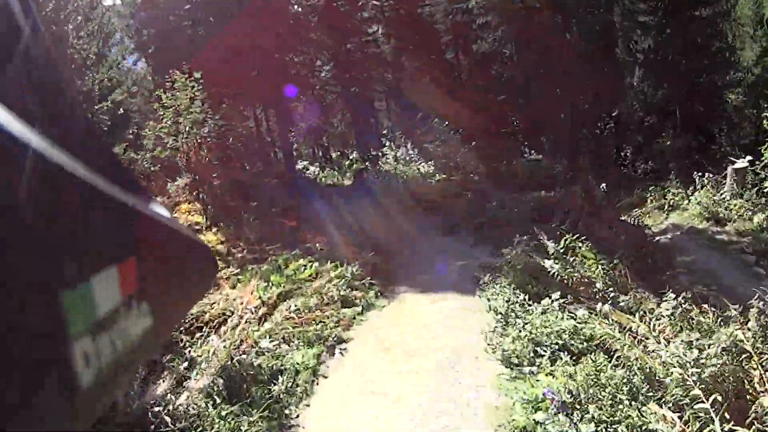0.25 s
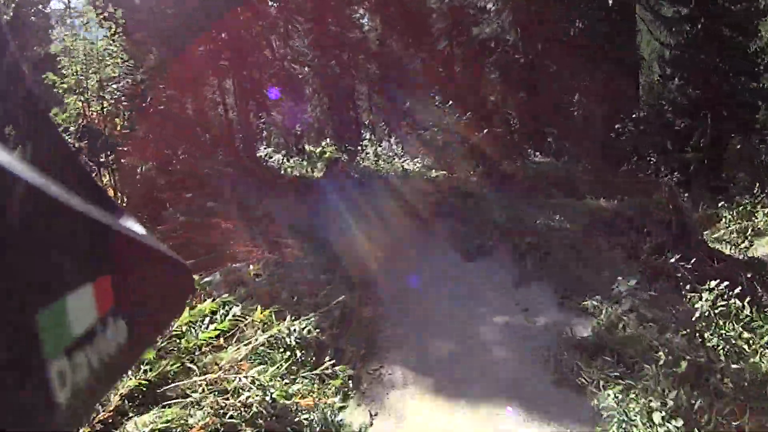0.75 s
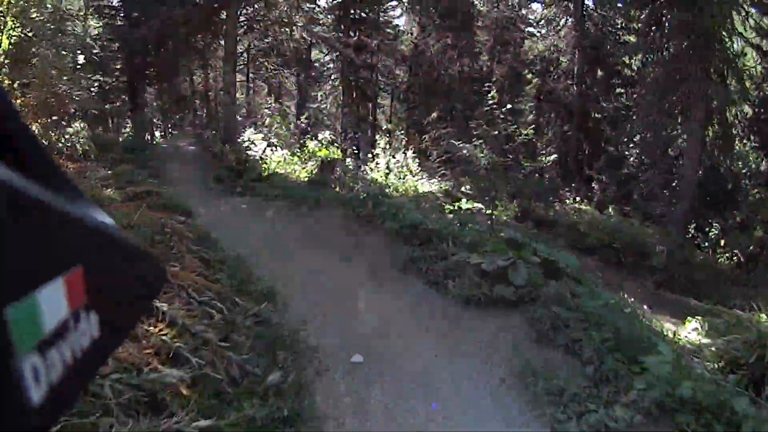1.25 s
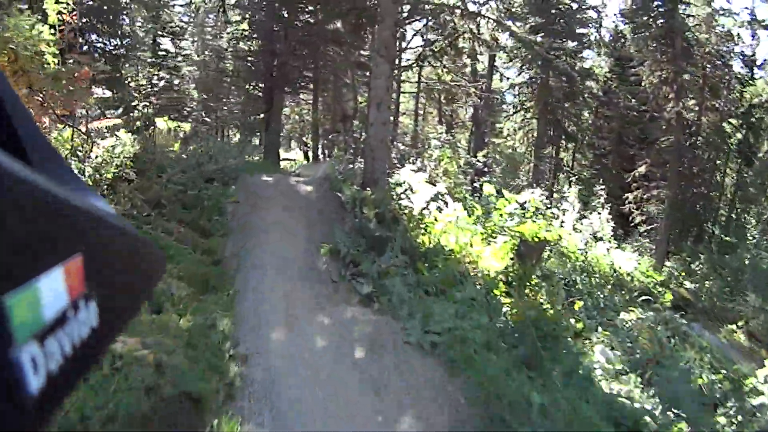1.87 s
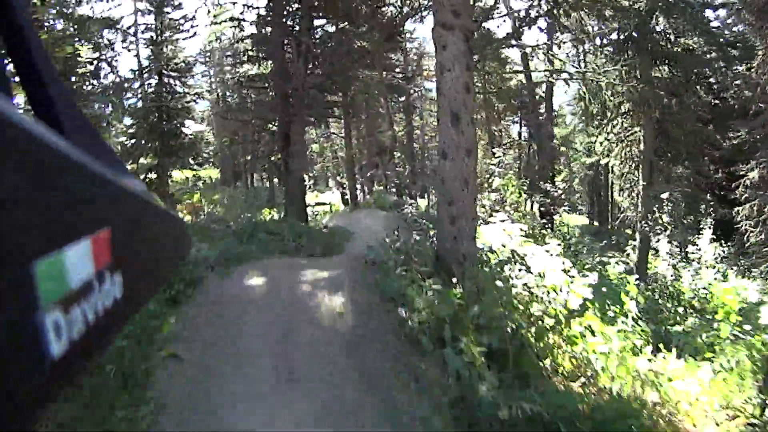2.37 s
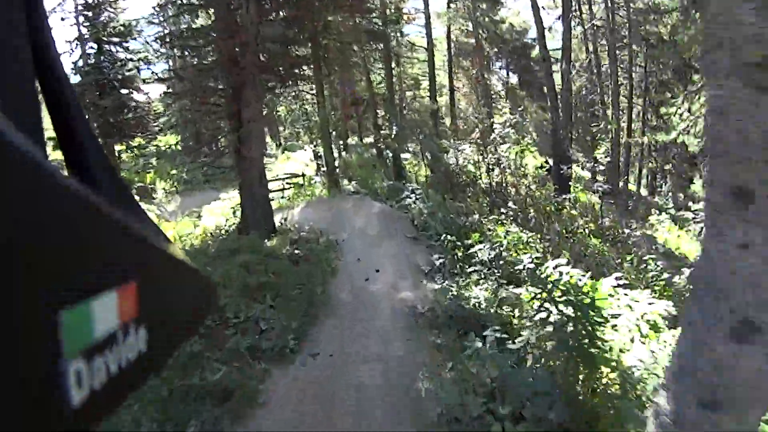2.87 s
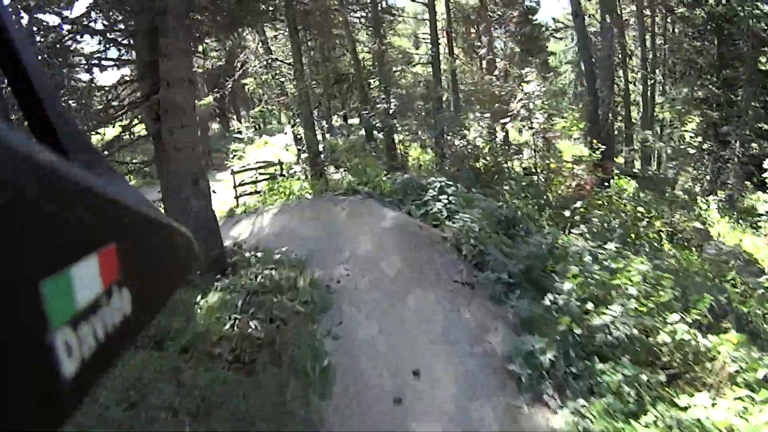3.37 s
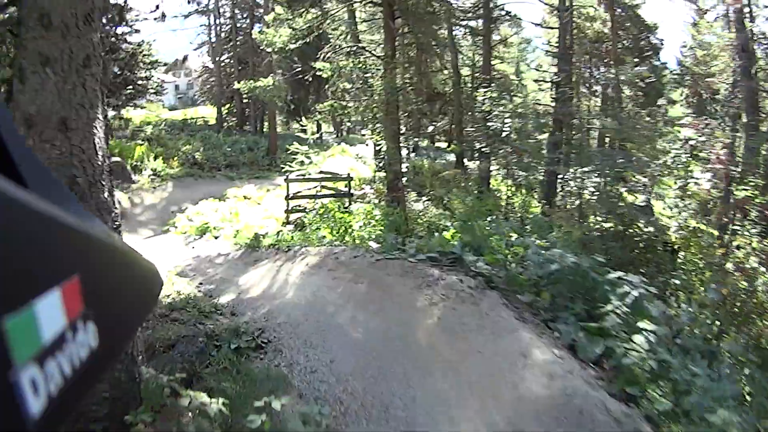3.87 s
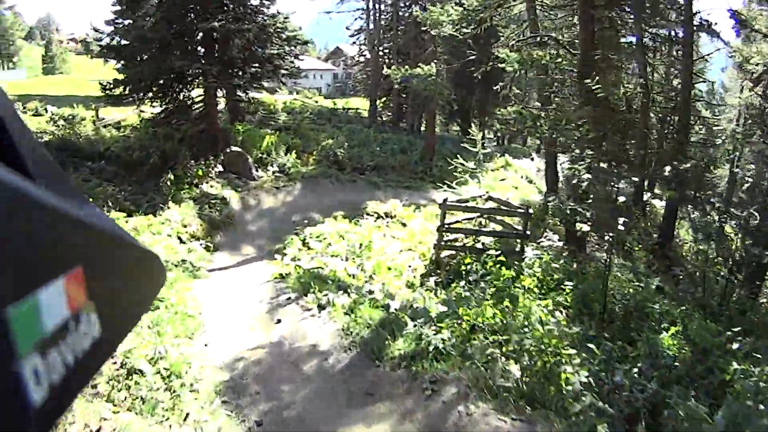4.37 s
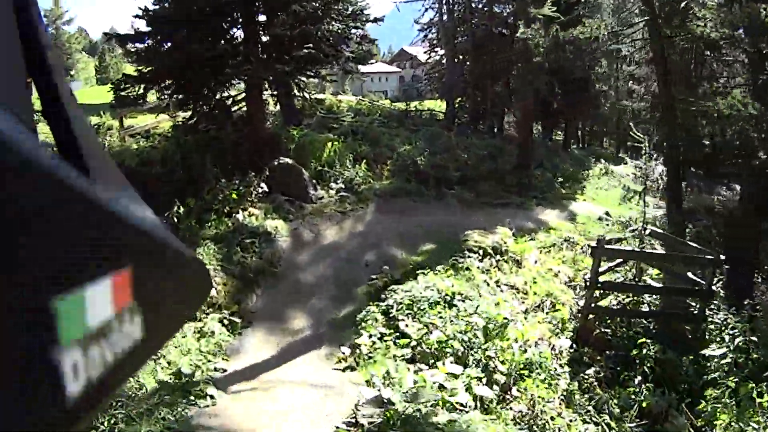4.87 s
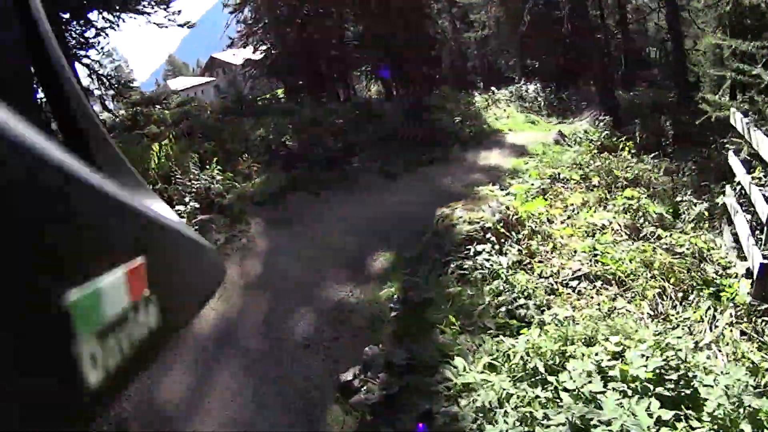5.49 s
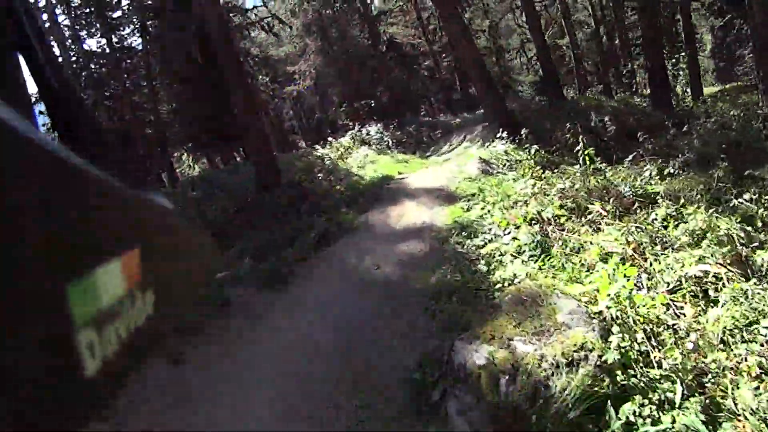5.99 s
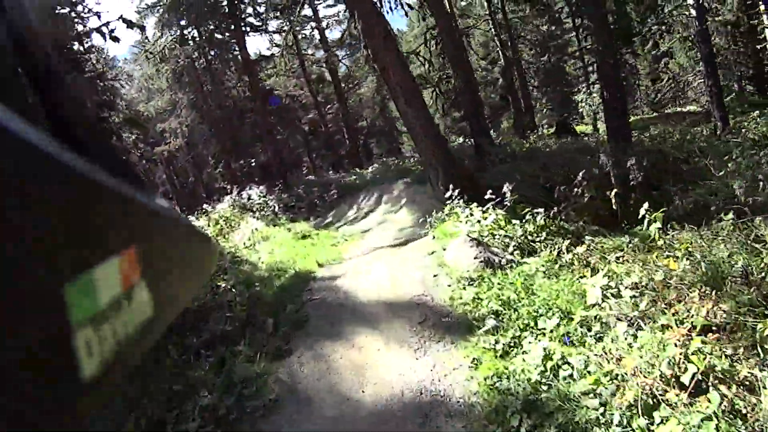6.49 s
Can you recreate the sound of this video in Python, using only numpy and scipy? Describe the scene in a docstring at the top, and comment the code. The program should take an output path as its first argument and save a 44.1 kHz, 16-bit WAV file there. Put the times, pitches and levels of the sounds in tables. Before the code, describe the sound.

A bike coasts down a forest trail, heard from a helmet microphone. Lumpy wind rumble and sharp pops cover the first second, then fall away to reveal crunching tyres, rapid freewheel ticking and dry rattles. Gusts return around two and a half seconds, ease near three and a half for more clatter, then build from about five seconds into rough, crackling wind to the end.

```python
"""A forest trail, heard from a helmet camera with two microphone ports, on a mountain bike coasting downhill.
Closest are the gusts on the ports: noise lumps as rumble, pressure pulses as small eddies, single pops and snaps.
Below the rider and a little to the right, clumped noise is the tyres on gravel and timed bursts the freewheel;
bumps ring the frame's modes and flung stones strike it as short decaying sines."""
import sys
import numpy as np
from scipy import signal
from scipy.fft import rfft, irfft, next_fast_len
from scipy.io import wavfile
from scipy.ndimage import uniform_filter1d, minimum_filter1d, map_coordinates

SR = 44100
rng = np.random.default_rng(int(sys.argv[2]) if len(sys.argv) > 2 else 0)


def log_audio(samples):
    """Write samples as a 16-bit WAV file to the path given in sys.argv[1]."""
    # one column per channel
    frames = np.atleast_2d(samples).T
    # limit to full scale, then quantise
    limited = np.clip(frames, -1, 1)
    pcm = np.round(limited * 32767).astype(np.int16)
    wavfile.write(sys.argv[1], SR, pcm)


N = 297217


def amp(db):
    """Gain of a level in dB."""
    return 10 ** (np.asarray(db) / 20)


def unit(x):
    """Scaled to rms 1."""
    return x / np.sqrt(np.mean(np.abs(x) ** 2) + 1e-20)


def along(points, hz):
    """Value of a (frequency, value) table at hz, read on a log frequency axis."""
    f, v = np.transpose(points)
    return np.interp(np.log(hz + 1), np.log(f + 1), v)


def curves(rows):
    """One value per sample for each column after the time."""
    s, *cols = np.transpose(rows)
    return [np.interp(np.arange(N) / SR, s, c) for c in cols]


def wobble(rate):
    """A smooth random curve, rate knots a second."""
    knots = rng.standard_normal(int(N * rate / SR) + 4)
    return map_coordinates(knots, [np.arange(N) * rate / SR])


def filtered(x, response):
    """x times a complex response of frequency."""
    m = next_fast_len(N + SR // 2)
    return irfft(rfft(x, m) * response(np.fft.rfftfreq(m, 1 / SR)), m)[..., :N]


def ports(pair, spectrum, alike):
    """Two unrelated signals coloured and blended into left and right, rms 1."""
    def blend(hz):
        turn = np.arccos(np.clip(along(alike, hz), -1, 1)) / 2
        return amp(along(spectrum, hz)) * [np.cos(turn), np.sin(turn)]

    mid, side = filtered(pair, blend)
    return unit(np.array([mid + side, mid - side]))


def grains(rate, spread_db):
    """Random impulses of either sign, rate a second, a few larger than the rest."""
    when, size, sign = rng.random((3, N))
    return (when < rate / SR) * amp(-spread_db * np.log(size + .03)) * np.sign(sign - .5)


def patchy(x, depth_db):
    """Random patches of gain, several hundred Hz wide and about 40 ms long, the same on both rows."""
    z = signal.stft(x, nperseg=256)[2]
    field = uniform_filter1d(rng.standard_normal(z.shape[1:]), size=4, axis=0)
    field = uniform_filter1d(field, size=14, axis=1)
    return signal.istft(z * amp(depth_db * unit(field)), nperseg=256)[1][:, :N]


# wind on the ports: (time [s], strength as the level of its rumble [dB], small eddies over usual share [dB])
WIND = [(0, -21.5, -2.5), (.12, -18, -2.5), (.2, -20.5, -2), (.3, -22.5, -9.5), (.38, -14, 1),
        (.445, -22.5, -9.5), (.53, -16, -0.5), (.64, -17.5, 2.5), (.73, -19.5, -3.5), (.77, -21.5, -9),
        (.86, -27.5, -20), (.92, -41.5, -7), (1.14, -34.5, 7), (1.18, -26, 3), (1.29, -34, 0),
        (1.7, -34.5, -10), (1.712, -20, 0), (1.8, -22, -4), (1.818, -25.5, -6), (1.835, -21.5, -6),
        (1.878, -20.5, -4), (1.89, -44, -26), (1.905, -23, -1), (1.943, -22.5, -6), (1.953, -34.5, -5),
        (2.23, -33, -1.5), (2.32, -25, -14), (2.34, -23, -10), (2.375, -24.5, -18), (2.4, -19.5, -16),
        (2.47, -16.5, -6), (2.53, -17, 0), (2.58, -24, -16), (2.62, -17.5, -12), (2.66, -13, 6.5),
        (2.7, -20, -4.5), (2.73, -16, -4), (2.79, -20.5, -17), (2.83, -15, 1.5), (2.96, -20.5, -2.5),
        (3.0, -22.5, -14), (3.15, -19, 0), (3.27, -19.5, -8.5), (3.36, -16, 4.5), (3.47, -21, -14.5),
        (3.58, -20.5, -22), (3.65, -34, -4), (3.75, -43, 3), (3.85, -46, 1), (3.96, -33.5, 5),
        (4.15, -37.5, -15), (4.26, -27, 2), (4.35, -33, -13), (4.55, -34, -4), (4.62, -31, -8),
        (4.7, -30.5, -10), (4.76, -21.5, -11), (4.81, -20.5, -13.5), (4.86, -21.5, -8), (4.9, -13, -1.5),
        (4.94, -19.5, -14), (5.0, -16, -4), (5.03, -22, -22), (5.12, -17, -6.5), (5.22, -13, -6),
        (5.33, -14.5, -7), (5.41, -18, -4.5), (5.5, -16.5, 3.5), (5.6, -16, -5.5), (5.69, -22.5, 0.5),
        (5.75, -22, 2.5), (5.88, -19, -2.5), (5.97, -17, 2), (6.05, -34, 6), (6.12, -13, 4.5),
        (6.145, -15, 1), (6.22, -15.5, -0.5), (6.3, -16, -3), (6.38, -20, -6.5), (6.45, -13, -3.5),
        (6.52, -19.5, -6), (6.6, -15.5, 1), (6.69, -22, 2.5), (6.74, -23.5, -7)]
# depth of the rumble: (time [s], bass below DEEP_HZ over its usual share [dB])
RUMBLE_DEPTH = [(0, -2), (.5, -2), (.95, 0), (1.5, -0.5), (1.85, 2), (2.35, 2), (2.7, -1.5), (3.1, 3),
                (3.4, -3), (3.56, -8), (3.75, 4), (4.0, -1), (4.35, 2), (4.8, 4.5), (4.93, 5), (5.05, -3),
                (5.5, -0.5), (6.0, 2.5), (6.3, -1), (6.74, 0)]
# spectra of helmet buffeting, rumble and small eddies: (frequency [Hz], level per Hz [dB])
THUD_SPECTRUM = [(15, -35), (25, -14), (45, -5.5), (90, -1), (130, -7), (250, -59), (22000, -120)]
RUMBLE_SPECTRUM = [(40, -45), (90, -9.5), (125, -0.5), (250, -0.5), (350, -3), (600, -10.5), (1200, -26.5),
                   (3000, -69), (22000, -120)]
EDDY_SPECTRUM = [(30, -34), (100, -2.5), (250, -2.5), (500, 0), (820, -0.5), (1200, -6), (1700, -13),
                 (2300, -18.5), (3000, -28.5), (4000, -41.5), (5400, -48), (11000, -55), (22000, -120)]
# likeness of the wind at the two ports: (frequency [Hz], correlation [-1 to 1])
WIND_ALIKE = [(60, 0.45), (130, 0.82), (260, 0.31), (600, 0.084)]
# lead of an eddy at the left port: (frequency [Hz], phase [rad])
EDDY_LEAD = [(100, .1), (340, 0.95), (700, 2.3), (3000, 2.16), (6000, 1.8)]
GUST_DB = -20  # strength of a full gust
BUFFET_DB, BUFFET_GROWS = -33.5, 0.71  # helmet buffeting in a full gust [dB], growth [dB per dB of wind]
BUFFET_KICK = 0.49  # extra buffeting [dB per dB of recent rise]
EDDY_DB, EDDY_GROWS = -18.5, 1.31  # small eddies in a full gust [dB], growth [dB per dB of wind]
SURGE_DB, BUFFET_SURGE_DB = 0.98, 3  # depth of random surges, several a second
SETTLE_S = 0.31  # small eddies follow the wind averaged over this time
DEEP_HZ = 150


def wind():
    """Large eddies blur into a lumpy rumble; small ones are sharp pressure pulses, out of phase at the ports."""
    strength_db, sharp_db = curves(WIND)
    over_db = strength_db - GUST_DB
    span = int(SETTLE_S * SR)
    settled_db = uniform_filter1d(over_db, size=span)
    # a gust that sets in jolts the helmet
    rise_db = settled_db - np.pad(settled_db, (span, 0), 'edge')[:N]
    gust, flutter, surge = wobble(16), wobble(45), wobble(11)

    buffet_db = BUFFET_DB + BUFFET_GROWS * np.minimum(settled_db, over_db)
    buffet_db = buffet_db + BUFFET_KICK * np.clip(rise_db, 0, None) + BUFFET_SURGE_DB * wobble(5.5)
    thud = amp(buffet_db) * ports(rng.standard_normal((2, N)), THUD_SPECTRUM, WIND_ALIKE)

    swirls = unit([grains(300, spread_db=3.5), grains(300, spread_db=2.5)])
    flaps_db = 0.9 * gust + 1.1 * flutter  # separate buffets with brief gaps
    lumps = amp(flaps_db + SURGE_DB * surge) * (rng.standard_normal((2, N)) + 0.85 * swirls)
    roar = ports(lumps, RUMBLE_SPECTRUM, WIND_ALIKE)
    deep = filtered(roar, lambda hz: 1 / (1 + (hz / DEEP_HZ) ** 4))
    rumble = amp(strength_db) * (roar + (amp(curves(RUMBLE_DEPTH)[0]) - 1) * deep)

    shared = grains(650, spread_db=3.5)
    own = np.array([grains(650, spread_db=3.5), grains(650, spread_db=3.5)])
    pulses = unit(amp(0.81 * gust + 1.76 * flutter + SURGE_DB * surge) * (shared + 0.69 * own))
    edges = unit(pulses * np.abs(pulses) ** 0.82)  # only the strongest pulses have steep, bright edges

    def flick(hz):
        return amp(along(EDDY_SPECTRUM, hz)) * np.exp(.5j * along(EDDY_LEAD, hz) * [[1], [-1]])

    def dull(hz):
        return 1 / (1 + (hz / 1300) ** 3.8)

    eddies = filtered(pulses, lambda hz: flick(hz) * dull(hz))
    eddies = eddies + filtered(edges, lambda hz: flick(hz) * (1 - dull(hz)))
    eddies_db = EDDY_DB + EDDY_GROWS * settled_db + sharp_db
    return thud + rumble + amp(eddies_db) * unit(eddies)


# single strong eddies: (time [s], peak level [dB], left over right [dB])
POPS = [(0.03, -6, 12), (0.099, -4, 5), (0.124, 1.5, -26), (0.159, -7, 8), (0.326, -7, 5), (0.356, -5, 6),
        (0.392, -2, 6), (0.472, -5, 8), (0.52, -11, -13), (0.554, -3, 8), (0.588, -9, 8), (0.679, -3, 8),
        (0.729, -7, 1), (1.709, -10, -8), (1.719, -7, -1), (1.73, -5, 16), (1.76, -15, 9), (1.77, -14, -14),
        (1.794, -15, -5), (1.829, -6, -4), (1.836, -9, 5), (1.858, -22, 3), (1.878, -11, 2),
        (1.901, -10, -8), (1.91, -9, 13), (1.943, -14, 14), (2.337, -11, -10), (2.639, -5, -11),
        (2.651, -6, 18), (2.72, -13, 10), (2.868, 4, 11), (2.892, -5, -12), (2.96, -3, -17),
        (3.023, -6.5, 3), (3.188, 2, 21), (3.199, -3, -12), (3.244, -3, -14), (3.377, -8, 3),
        (4.072, -15.5, -1), (4.219, -18.5, 3), (4.26, -10.5, -3), (4.311, -16, -2), (4.32, -15, 1),
        (4.972, -1.5, 3), (5.11, -1.5, 5), (5.121, 1, 19), (5.147, -5, -11), (5.175, -11, 15),
        (5.199, -18, 10), (5.309, -3, 5), (5.378, -9, 10), (5.4, -4, 12), (5.419, -11, -7),
        (5.448, -4, -12), (5.496, -8, 6), (5.577, -1.5, -1), (5.64, 0.5, 3), (5.655, -6, -2),
        (5.707, -7, -5), (5.819, -3, 14), (5.859, 1.5, -4), (5.891, -10, -7), (5.929, -12, -9),
        (5.946, -14, 10), (5.966, -12, 8), (6.124, 1.5, 0), (6.277, -10, 13), (6.291, -5, 9),
        (6.319, -11, -11), (6.455, -7, 10), (6.51, -12, 0), (6.544, -9, -13), (6.659, 2.5, -22),
        (6.7, -12, 12)]
POP_MS, POP_WIDENS = 0.44, 0.076  # width in a full gust [ms], widening [ms per dB of weaker wind]
OPPOSED_DB = -22  # wind stronger than this presses the ports in opposition


def pops():
    """A strong eddy is one short bump of pressure or suction with a rebound; it sweeps the left port first."""
    out, ms = np.zeros((2, N + SR)), np.arange(-300, 300) / SR * 1000
    strength_db = curves(WIND)[0]
    for s, db, pan_db in POPS:
        wind_db = strength_db[round(s * SR)]
        width = POP_MS + POP_WIDENS * max(GUST_DB - wind_db, 0)
        u = (ms / width - np.array([[-.2], [.2]])) * 1.37
        bump = rng.choice([-1, 1]) * (1 - 0.89 * u ** 2) * np.exp(-u ** 2 / 2)
        sides = amp([[db + min(pan_db, 0)], [db - max(pan_db, 0)]])
        sides = sides * [[1], [np.sign(OPPOSED_DB - wind_db)]]
        out[:, round(s * SR) - len(ms) // 2:][:, :len(ms)] += sides * bump
    return out[:, :N]


# sharp edges of eddies across both ports: (time [s], level of the body [dB], treble over it [dB])
SNAPS = [(0.0297, -8, -11), (0.0995, -15.0, -18), (0.3556, -9, -23.0), (0.3641, -15.0, -20.0),
         (0.3855, -13.0, -16.0), (0.393, -12.0, -17.0), (0.5345, -18, -21), (0.5804, -11, -11),
         (0.5987, -16.0, -18.0), (0.608, -11, -17.0), (0.634, -16, -19.0), (0.6444, -21, -16.0),
         (0.6796, -16, -24.0), (0.7291, -10.5, -23.0), (2.5314, -10, -14.0), (2.6516, -14, -19.0),
         (2.6694, -10, -3), (2.684, -15, -13.0), (2.7244, -12, -12.0), (2.731, -12, -13.0),
         (2.8142, -7, -15), (2.869, -14.0, -19.0), (2.9189, -17.0, -18.0), (3.1434, -13, -12.0),
         (3.188, -10, -19.0), (3.2007, -15.0, -17.0), (3.2451, -16, -16.0), (3.2679, -14.0, -20.0),
         (3.3496, -14, -15.0), (3.3775, -12, -12.0), (5.1482, -11, -11), (5.3088, -12.0, -19.0),
         (5.3222, -17, -9), (5.378, -13.0, -19.0), (5.4007, -11.0, -20), (5.411, -5, -14.0),
         (5.4187, -18, -15.0), (5.426, -9, -19.0), (5.4321, -14.0, -13.0), (5.4363, -20.0, -9.0),
         (5.4486, -8, -22.0), (5.4675, -19.0, -11.0), (5.4749, -9, -11.0), (5.478, -9, -3),
         (5.4849, -8, -18.0), (5.4931, -23, -9.0), (5.5056, -9.0, -20.0), (5.5107, -14, -12.0),
         (5.5188, -23.0, -5.0), (5.5271, -6, -13), (5.5443, -28, 5), (5.556, -12, -20.0), (5.585, -14, -3),
         (5.6452, -6, -26.0), (5.6513, -12, -10), (5.655, -7, -23.0), (5.672, -16.0, -2),
         (5.6889, -13.0, -17.0), (5.7045, -9, -9.0), (5.707, -9, -3), (5.7148, -10, -17.0),
         (5.7312, -21.0, -9.0), (5.7404, -10.0, -25.0), (5.749, -14, -16.0), (5.7636, -19.0, -3),
         (5.7749, -15.0, -9.0), (5.7927, -8, -15.0), (5.8079, -17, -2), (5.814, -13, -10.0), (5.82, -2, -6),
         (5.8268, -6, -18.0), (5.833, -10, -15.0), (5.8443, -17, -10.0), (5.8483, -12, -13.0),
         (5.8605, -8, -14.0), (5.92, -28.0, -1.0), (5.929, -11, -7.0), (5.947, -11, -11.0),
         (5.952, -9, -12), (5.9684, -7, -16.0), (5.9757, -21.0, -10), (5.9851, -5, -9),
         (5.9893, -27.0, 0.0), (5.9932, -8, -21.0), (5.996, -15.0, -12.0), (5.999, -13.0, -18),
         (6.0076, -16.0, -11.0), (6.011, -13.0, -17.0), (6.0219, -15.0, -7.0), (6.0285, -21.0, -7.0),
         (6.0337, -7, -5), (6.0377, -16, -2), (6.0428, -13, -10.0), (6.062, -4, -17.0),
         (6.0716, -16.0, -6.0), (6.0761, -17, -5.0), (6.0862, -16.0, -9.0), (6.0973, -20, -9.0),
         (6.1113, -20.0, -10.0), (6.1238, -11.0, -16.0), (6.2014, -26.0, -3.0), (6.2138, -12.0, -16.0),
         (6.2174, -18, 2), (6.2461, -11, -13.0), (6.2553, -15, -8.0), (6.2768, -15, -18.0),
         (6.2912, -10.0, -29.0), (6.313, -20.0, -9.0), (6.317, -14.0, -14.0), (6.4114, -27, 7),
         (6.4693, -16, -17.0), (6.6448, -15, -7), (6.6535, -27.0, -1), (6.6606, -7, -10.0),
         (6.6873, -19, -8.0), (6.6953, -11, -5), (6.6995, -6, -6)]
SNAP_HZ, SNAP_MS = 1330, 0.42  # pitch and width of the body
SNAP_TREBLE_HZ, SNAP_TREBLE_MS = 2700, 0.18  # pitch and width of the treble


def snaps():
    """Each edge is a cycle or two of pressure with a brighter tip, leading at the left port."""
    out, ms = np.zeros((2, N + SR)), np.arange(-100, 100) / SR * 1000

    def wavelet(hz, width, turn):
        lead = along(EDDY_LEAD, hz) * np.array([[.5], [-.5]])
        return np.exp(-(ms / width) ** 2 / 2) * np.cos(2 * np.pi * hz * ms / 1000 + turn + lead)

    for (s, db, treble_db), turn in zip(SNAPS, 2 * np.pi * rng.random(len(SNAPS))):
        body = wavelet(SNAP_HZ, SNAP_MS, turn)
        tip = amp(treble_db) * wavelet(SNAP_TREBLE_HZ, SNAP_TREBLE_MS, turn)
        out[:, round(s * SR) - len(ms) // 2:][:, :len(ms)] += amp(db) * (body + tip)
    return out[:, :N]


# rolling bike: (time [s], level of tyre hiss and freewheel [dB], gravel crunch over it [dB])
ROLLING = [(0, -57, 9), (.28, -51, 14), (.6, -49.5, 12.5), (.8, -49, 17.5), (1.0, -48, 14), (1.2, -51, 17),
           (1.33, -48.5, 18), (1.45, -45.5, 15.5), (1.54, -44, 17.5), (1.58, -45.5, 14.5), (1.64, -44, 13),
           (1.69, -44.5, 17.5), (1.72, -44.5, 15.5), (1.87, -47.5, 10.5), (2.0, -44.5, 12.5),
           (2.3, -44, 13), (2.5, -46, 16), (2.78, -42.5, 12.5), (2.84, -49.5, 12), (3.0, -45.5, 8),
           (3.058, -47.5, 8), (3.082, -36.5, 16), (3.105, -41.5, 0), (3.15, -52, 9), (3.35, -48, 11),
           (3.49, -48, 16.5), (3.6, -47, 17.5), (3.7, -45.5, 13.5), (3.79, -45, 16), (3.88, -44, 16),
           (3.97, -43, 15.5), (4.1, -40.5, 8), (4.33, -42.5, 6.5), (4.5, -44, 10.5), (4.8, -45, 13.5),
           (5.0, -46.5, 9.5), (5.2, -45.5, 8.5), (5.38, -52, 15), (5.55, -49, 12), (5.8, -53, 17),
           (5.91, -52.5, 17), (6.02, -56.5, 25), (6.25, -55, 7), (6.6, -55, 12), (6.74, -50, 17)]
# spectrum of the crunch: (frequency [Hz], level per Hz [dB])
CRUNCH_SPECTRUM = [(60, -45), (200, 6), (450, -2), (800, 2), (1300, -4), (1700, -7), (2200, -5.5),
                   (3000, -11.5), (4400, -22), (5500, -23.5), (7000, -40), (22000, -120)]
# likeness of the bike at the two ports: (frequency [Hz], correlation [-1 to 1])
BIKE_ALIKE = [(300, 0.34), (1200, 0.87), (2500, 0.84), (5000, 0.58), (11000, 0.76)]


def gravel():
    """Stones crack and shift under the tread in clumps, over the steady roll of the rubber."""
    treble_db, over_db = curves(ROLLING)
    clumps = amp(1.64 * wobble(20) + 0.41 * wobble(55) + 0.1 * wobble(9.1))
    cracks = np.abs(unit(grains(2500, spread_db=2.0)))
    grit = unit(clumps * (0.63 + cracks))
    crunch = patchy(grit * rng.standard_normal((2, N)), depth_db=2.0)
    return amp(treble_db + over_db) * ports(crunch, CRUNCH_SPECTRUM, BIKE_ALIKE)


# freewheel, following the speed of the wheel: (time [s], tick rate [1/s])
RATCHET = [(0, 123), (1.4, 95), (1.72, 136), (1.95, 110), (2.35, 107), (2.8, 86), (3.0, 69), (3.6, 126),
           (3.8, 92), (4.1, 66), (4.25, 84), (4.52, 65), (4.88, 93), (5.15, 67), (5.85, 90), (6.74, 78)]
# spectrum of ticks and tyre hiss: (frequency [Hz], level per Hz [dB])
HISS_SPECTRUM = [(1500, -33), (3500, -1.5), (5000, -2), (5900, -1.5), (6700, 2), (7500, 0), (9000, -2),
                 (11000, -4), (22000, -22)]
TICK_SHARE, SHARE_FALLS = 0.57, 0.008  # ticks' share of the power at 100 a second, loss per extra tick a second


def freewheel():
    """Each pawl drop is a short bright burst; tyre hiss fills the gaps."""
    treble_db, _ = curves(ROLLING)
    rate, = curves(RATCHET)
    share = np.clip(TICK_SHARE - SHARE_FALLS * (rate - 100), 0, 1)
    turns = np.cumsum(rate / SR) + 0.034 * wobble(40)  # ticks so far, slightly uneven
    since = (turns % 1) / rate  # seconds since the last tick
    size = amp(1.96 * rng.standard_normal(N // 100))[turns.astype(int)]
    ticks = unit(size * amp(-60 * since / 0.043) * (1 - np.exp(-since / 0.0011)))
    flutter = amp(0.58 * wobble(12) + 0.56 * wobble(35))
    level = flutter * np.sqrt(share * ticks ** 2 + 1 - share)
    bursts = patchy(level * rng.standard_normal((2, N)), depth_db=1.3)
    return amp(treble_db) * ports(bursts, HISS_SPECTRUM, BIKE_ALIKE)


# bumps that rattle the frame: (time [s], level [dB], pitch of its own ring [Hz], length [s])
BUMPS = [(0.924, -27.5, 1110, 0.014), (0.964, -32, 1500, 0.011), (0.989, -26, 935, 0.016),
         (0.998, -35, 2900, 0.007), (1.009, -27.5, 1500, 0.013), (1.042, -27, 940, 0.024),
         (1.089, -35, 1300, 0.014), (1.114, -28, 1510, 0.012), (1.121, -29, 780, 0.013),
         (1.156, -34, 1600, 0.015), (1.179, -21.5, 1500, 0.012), (1.188, -25.5, 900, 0.017),
         (1.217, -25, 2150, 0.02), (1.264, -30.5, 840, 0.012), (1.307, -26.5, 2010, 0.007),
         (1.324, -28, 2200, .008), (1.335, -31, 865, 0.018), (1.347, -33, 2600, .015),
         (1.377, -33, 1800, 0.026), (1.477, -27.5, 1190, 0.029), (1.507, -27, 1140, 0.026),
         (1.521, -29, 1950, 0.057), (2.522, -25, 2150, 0.0086), (2.633, -24, 1496, 0.02),
         (2.663, -18, 1820, 0.0093), (2.728, -28, 1200, 0.0064), (2.809, -27, 890, 0.0063),
         (2.845, -31, 1210, 0.023), (2.891, -26.5, 1406, 0.012), (2.953, -28, 1080, 0.0083),
         (3.066, -18.5, 1130, 0.0079), (3.076, -29, 2660, 0.013), (3.136, -28, 1500, 0.0067),
         (3.265, -34, 1500, .005), (3.339, -28, 1900, 0.008), (3.391, -33, 2000, 0.0038),
         (3.431, -30, 2170, 0.026), (3.461, -33, 2100, 0.017), (3.518, -27.5, 1720, 0.026),
         (3.571, -23, 1600, 0.007), (3.592, -30, 960, 0.015), (3.6, -29, 1750, 0.02),
         (3.685, -34, 1950, 0.027), (3.746, -27, 813, 0.041), (3.795, -23, 1004, 0.0097),
         (3.813, -21, 1790, 0.0087), (3.853, -32, 1964, .006), (3.869, -26.5, 860, 0.011),
         (3.929, -32, 730, 0.024), (3.985, -24, 990, 0.04), (4.009, -22.5, 1720, 0.018),
         (4.011, -17, 740, 0.0069), (4.029, -30, 1300, .025)]
# modes of the frame: (frequency [Hz], width [Hz], level [dB])
FRAME_MODES = [(380, 210, -3.5), (830, 400, 3), (1370, 870, 3.5), (2260, 1900, 1)]
GRIT_DB = -7.5  # broad grit under the ring
RING_S, RING_GROWS = 0.022, 0.47  # fall by 60 dB after a sharp knock [s], extra time per second of length


def rattle():
    """A bump shakes cables and chain on the frame: a burst through the frame's modes, its own ring and grit."""
    out, t = np.zeros((2, N + SR)), np.arange(SR // 8) / SR
    f = np.fft.rfftfreq(len(t), 1 / SR)

    def mode(centre, width):
        return 1j * f * width / (centre * centre - f * f + 1j * f * width)

    frame = sum((-1) ** k * amp(db) * mode(c, w) for k, (c, w, db) in enumerate(FRAME_MODES))
    for s, db, hz, length in BUMPS:
        ring = frame + 3.6 * mode(hz, 0.16 * hz)
        ring = ring / (1 + 1j * f / 3600) ** 3  # helmet and rider shade the treble
        colour = unit(ring + amp(GRIT_DB) * mode(2460, 2080) ** 2)
        rise = 0.53 * length  # sharp knocks build up fast, long scrapes swell
        fall = amp(-60 * np.clip(t - length, 0, None) / (RING_S + RING_GROWS * length))
        swell = (1 - np.exp(-t / rise)) * fall
        links = 0.7 + (rng.random(len(t)) < 1500 / SR) * 4  # separate contacts inside the burst
        burst = irfft(rfft(swell * links * rng.standard_normal((2, len(t)))) * colour, len(t))
        # both rows scaled by the first, so that the burst has the energy of its swell
        mid, side = burst * np.linalg.norm(swell) / np.linalg.norm(burst[0])
        pair = np.array([mid + 0.34 * side, mid - 0.3 * side])
        out[:, round(s * SR):][:, :len(t)] += amp(db) * pair
    return out[:, :N]


# single stones flung against the frame, the last row (5.175 s) a sharp snap of the wind instead: (time [s],
# level [dB], pitch [Hz], fall by 60 dB [s])
KNOCKS = [(0.926, -12, 1100, .005), (1.015, -13, 1200, .004), (1.056, -14, 900, .006),
          (1.067, -9, 1600, 0.0043), (1.1245, -14, 800, .008), (1.1838, -8.5, 750, 0.015),
          (1.1887, -7, 800, 0.012), (1.219, -14, 2100, 0.005), (1.233, -12, 1100, 0.0045),
          (1.276, -15, 1000, .005), (1.311, -14, 1100, .007), (1.3303, -4.5, 990, 0.0068),
          (1.345, -13, 800, .008), (1.437, -17, 820, .005), (1.515, -13, 1150, .004),
          (2.368, -10, 1430, 0.0043), (2.4945, 6.5, 1280, 0.0022), (3.396, -16, 2000, .003),
          (3.443, -20, 2040, .006), (3.4744, -17, 2060, .005), (3.567, -10, 1560, 0.019),
          (3.767, -10, 1350, .004), (3.8516, -15, 1850, .004), (4.016, -7, 800, 0.012),
          (4.041, -5, 1800, 0.0018), (4.47, -18, 2386, .003), (4.578, -16, 2800, .003),
          (4.681, -11, 2300, 0.004), (5.175, -10, 1500, .003)]
KNOCK_RISE_S = 0.00029  # time constant of a stone's contact


def knocks():
    """Each knock is one dry blow: a short decaying sine, for a stone at the pitch of the tube that it hits."""
    out, t = np.zeros(N + SR), np.arange(SR // 40) / SR
    for s, db, hz, t60 in KNOCKS:
        blow = np.sin(2 * np.pi * hz * t) * amp(-60 * t / t60) * (1 - np.exp(-t / KNOCK_RISE_S))
        out[round(s * SR):][:len(t)] += rng.choice([-1, 1]) * amp(db) * blow
    return out[:N] * amp([[-1.2], [1.2]])  # to the right


def scene():
    """Wind at the ports, the bike below and a little to the right."""
    air = wind() + pops() + snaps()
    bike = gravel() + freewheel() + rattle() + knocks()
    return air + bike * amp([[-.6], [.6]])


AGC_DB, AGC_S, AGC_SLOPE = -18, .02, 0.45  # threshold, averaging time, dB taken off per dB over
TOP_HZ = 11000  # the treble fades out over the 500 Hz above this


def record(dry):
    """Gain control eases full gusts, a limiter ducks the highest peaks and the microphone's band is cut off."""
    power = np.abs(uniform_filter1d(np.mean(dry ** 2, axis=0), size=int(AGC_S * SR)))
    level_db = 10 * np.log10(power + 1e-12)
    held = dry * amp(-AGC_SLOPE * np.clip(level_db - AGC_DB, 0, None))
    needed = np.minimum(1, .85 / (np.abs(held).max(axis=0) + 1e-9))
    gain = uniform_filter1d(minimum_filter1d(needed, size=900, origin=300), size=300)
    return filtered(held * gain, lambda hz: amp(-np.clip(hz - TOP_HZ, 0, 500) / 8) * (hz < TOP_HZ + 500))


dry = scene()
out = record(dry)
log_audio(out)
```